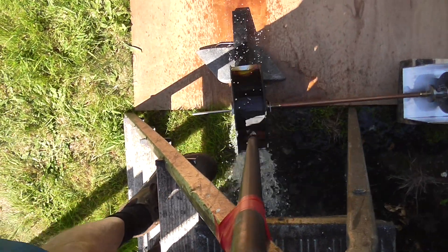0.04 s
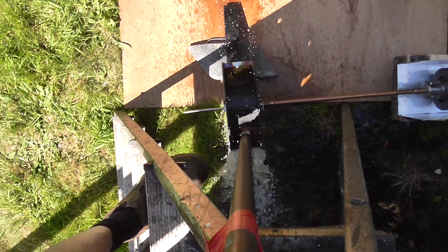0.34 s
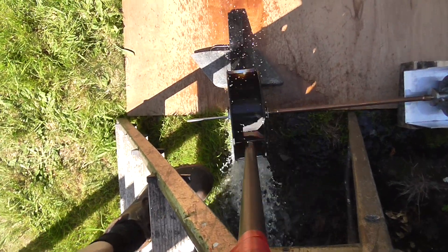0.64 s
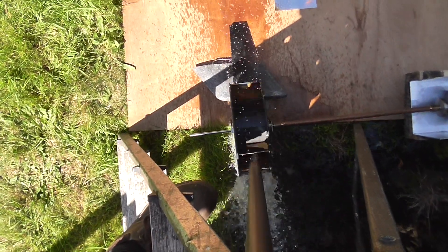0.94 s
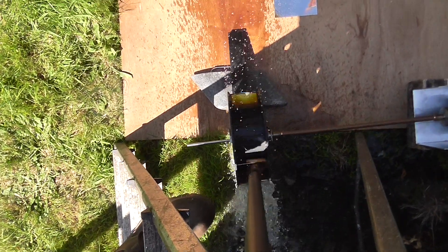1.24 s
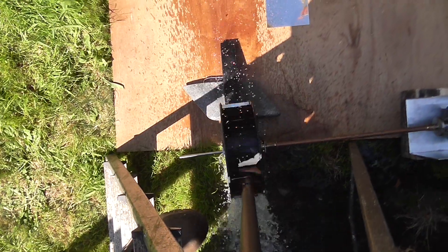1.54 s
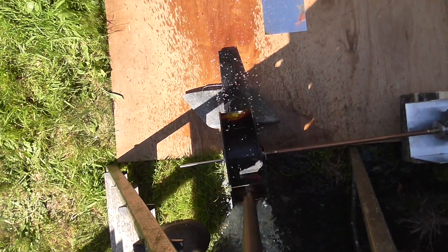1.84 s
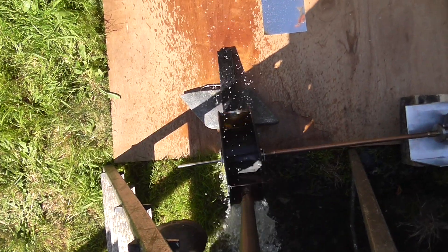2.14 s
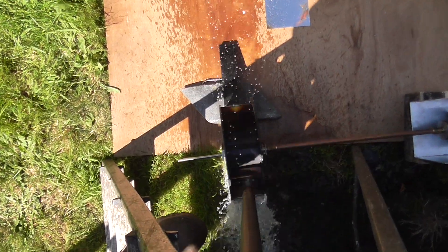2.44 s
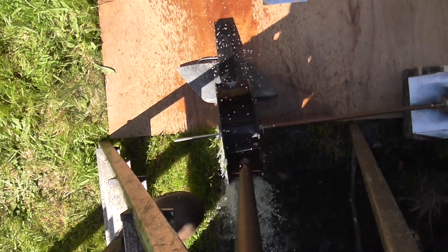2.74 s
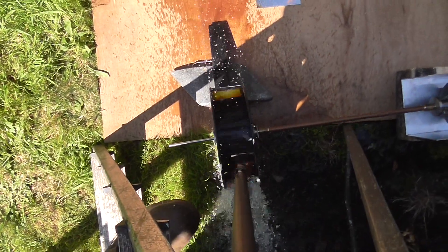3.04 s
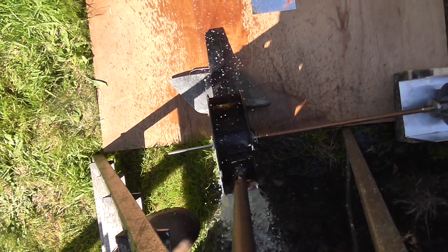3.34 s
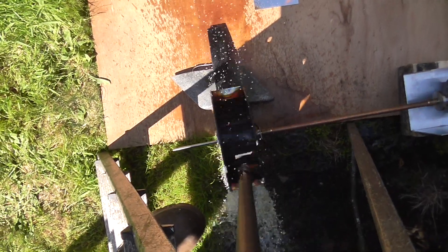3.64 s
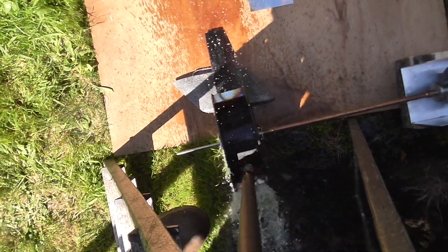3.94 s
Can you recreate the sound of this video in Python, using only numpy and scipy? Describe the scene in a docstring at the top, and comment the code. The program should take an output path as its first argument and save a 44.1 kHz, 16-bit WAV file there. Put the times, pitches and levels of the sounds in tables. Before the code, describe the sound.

Water splashes over a small waterwheel throughout, close up and outdoors, with fast pulsing spray, gurgling bubbles and faint knocking above a steady run-off. Sharp drops tick on wet boards. A heavy slap of water lands at 0.2 seconds and the jet surges at 0.7. Slaps and hollow gulps crowd together from 2.2 to 2.8 seconds, then thin out as the splashing continues to 4 seconds.

```python
"""Outdoors, stereo microphone just above a small waterwheel driven by a jet over wet boards.
The wheel is turning from the start: eight cups cut the jet each turn, throwing spray and knocking
the wheel, while air pockets gulp at the same places and bubbles gurgle over the run-off. A heavy slap
lands at 0.2 s and the jet surges at 0.7 s. Sharp drops hit the boards throughout; slaps and big gulps
crowd together from 2.2 to 2.8 s, then thin out as the wheel runs on."""
import sys
import numpy as np
from scipy import signal
from scipy.fft import rfft, irfft
from scipy.io import wavfile
from scipy.ndimage import uniform_filter1d

SR = 44100
rng = np.random.default_rng(int(sys.argv[2]) if len(sys.argv) > 2 else 0)


def unload_audio(sound):
    """Save the sound as a 16-bit wav file, at the path given as the first command line argument."""
    columns = np.transpose(np.atleast_2d(sound))
    # keep every value between -1 and 1, then stretch to whole-number steps
    steps = np.round(np.clip(columns, -1, 1) * 32767)
    wavfile.write(sys.argv[1], SR, steps.astype(np.int16))


N = 176400
TIME = np.arange(N) / SR
TURN_S = .3626
TURN_STARTS_S = np.arange(-1, N / SR / TURN_S) * TURN_S

# Tone of the run-off: frequency_hz, relative_db
WASH_SPECTRUM = [(45, -46), (100, -9.5), (270, -2.5), (450, -9), (1100, 5), (2000, 3.5), (2800, -10)]
# Reflections off the boards and frame: frequency_hz, level_db
REFLECTION_SPECTRUM = [(600, -25), (4600, -12.5), (6500, -30), (8000, -15), (10000, -4.5), (12500, -11.5)]
# Balance at the microphone: frequency_hz, left_minus_right_db
BALANCE = [(450, -2.5), (5500, 0), (9000, -1.5), (12500, 0)]
# Surging of the jet: time_s, level_db
JET_SURGE = [(0.0, -0.5), (0.2, 0.9), (0.57, -2), (0.7, 3), (0.93, 2), (1.03, 0.5), (1.28, 2.5), (1.61, -1),
             (1.83, 1.3), (2.45, 1), (2.56, -1), (2.8, 2.5), (2.93, 0.5), (3.2, 0.8), (4.0, 1.5)]
# Cups meeting the jet, timed from the start of a turn: start_s, relative_db
CUP_STROKES = [(.093, 5), (0.131, 1), (0.182, 9), (0.22, 9), (0.274, 4.5), (0.309, 7.5), (0.367, 7),
               (.402, 2.5)]
# Modes of the wheel and its mount: pitch_hz, level_db, width_hz
WHEEL_MODES = [(141.3, -60.5, 17.5), (248.6, -54, 8.4), (283.5, -52, 36), (635.5, -46.5, 39),
               (1016, -49.5, 55), (1263, -49.5, 18)]
# Bubbles in the churned water: pitch_hz, relative_db
BUBBLE_SPECTRUM = [(350, -15.5), (520, -13), (700, -5.5), (1350, 1.5), (1650, -7.5), (2100, -5),
                   (2500, -12.5), (3500, -18)]
# Air pockets that gulp on every turn, timed from its start: start_s, pitch_hz, level_db
AIR_POCKETS = [(.130, 1016, -38), (0.277, 1300, -32.5), (.324, 1305, -32)]
# Further gulps, each placed by its own start, among them a gulp near 830 Hz that returns on most turns:
# start_s, pitch_hz, level_db
BIG_GULPS = [(.134, 1037, -23), (.222, 1141, -30), (.222, 653, -25.5), (.466, 1068, -20), (.5, 1090, -36),
             (.615, 846, -27), (.768, 633, -29.5), (0.865, 1047, -29), (.983, 823, -23),
             (1.143, 1175, -28.5), (1.325, 1330, -19), (1.419, 1382, -23), (1.704, 834, -26),
             (1.914, 1109, -27), (2.207, 1387, -21), (2.308, 1038, -20.5), (2.424, 2160, -21.5),
             (2.427, 823, -25), (2.438, 1300, -26), (2.46, 963, -26), (2.575, 643, -27),
             (2.686, 1400, -23.5), (2.756, 1005, -23), (2.788, 833, -24.5), (3.031, 1042, -23.5),
             (3.725, 1093, -23.5), (3.879, 830, -24.5), (3.906, 1474, -23.5)]
# Heavy slaps of water: start_s, level_db, centre_hz, decay_s
WATER_SLAPS = [(.222, -15.5, 625, 0.0058), (0.2213, -12.5, 1860, 0.0038), (0.976, -18, 1710, 0.0046),
               (1.64, -17, 1970, 0.0036), (2.002, -16, 1770, 0.0036), (2.397, -22.5, 1230, 0.01),
               (2.422, -19.5, 1430, 0.02), (2.574, -16, 1000, 0.0066), (2.761, -21, 1043, 0.013),
               (3.577, -21, 2030, 0.0027)]
# Hollow of a cup, rung by the slaps: pitch_hz
CUP_MODES = [657, 843, 1026, 1217, 1583, 2006, 2294]
# Sharp drops on the boards: start_s, level_db
BOARD_DROPS = [(.125, -14), (.2197, -6.5), (.28, -15), (.3865, -13), (.4412, -10), (.4654, -10),
               (.866, -11), (.9488, -11), (1.308, -11.5), (1.4042, -10), (1.5548, -7), (1.8947, -7.5),
               (1.9504, -11.5), (2.0018, -10.5), (2.1281, -11.5), (2.4545, -12), (2.4978, -9), (2.8513, -7),
               (3.087, -12), (3.3402, -11), (3.3526, -11.5), (3.4323, -10), (3.8735, -10), (3.9515, -10.5)]
# Tone of the spray: frequency_hz, relative_db
SPRAY_SPECTRUM = [(1500, -40), (2700, -13.5), (3500, -5), (4400, -3.5), (6000, 0), (8200, -2), (9400, -5),
                  (10600, -11.5), (13500, -11.5), (15800, -25)]


def amp(db):
    """Decibels to gain."""
    return 10 ** (np.asarray(db) / 20)


def unit(x):
    """Scales to rms 1."""
    return x / np.sqrt(np.mean(x ** 2) + 1e-20)


def db_at(spectrum, hz):
    """Reads a spectrum table on a log-frequency axis."""
    table_hz, db = np.transpose(spectrum)
    return np.interp(np.log(hz + 1), np.log(table_hz + 1), db)


def add(mix, start_s, sound):
    """Mixes a sound in at start_s."""
    at = round(start_s * SR)
    sound = sound[max(-at, 0):]
    part = mix[max(at, 0):][:len(sound)]
    part += sound[:len(part)]


def colour(x, spectrum):
    """Filters by a spectrum table."""
    return irfft(rfft(x) * amp(db_at(spectrum, np.fft.rfftfreq(len(x), 1 / SR))), len(x))


def flatten(x):
    """Evens out the long-term spectrum, ready for colouring."""
    spectrum = rfft(x)
    power = abs(spectrum) ** 2
    floor = amp(-25) ** 2 * power.mean()
    return irfft(spectrum / np.sqrt(uniform_filter1d(power, size=1500) + floor), N)


def patter(per_s, size_db):
    """Random impacts, mostly small and a few large."""
    out = np.zeros(N)
    when, luck, side = np.random.default_rng(rng.integers(N)).random((int(per_s * N / SR), 3)).T
    size = np.minimum(-np.log(1 - luck), 4.5)
    out[(when * N).astype(int)] = np.sign(side - .5) * amp(size_db * size)
    return out


def burst(centre_hz, octaves, rise_s, decay_s, top_hz=20000):
    """A brief splash of noise around one pitch."""
    t = TIME[:SR // 5]
    hz = np.fft.rfftfreq(len(t), 1 / SR) + 1
    band = np.exp(-.5 * (np.log2(hz / centre_hz) / octaves) ** 2) / (1 + (hz / top_hz) ** 20)
    noise = unit(irfft(band * np.exp(2j * np.pi * rng.random(len(hz))), len(t)))
    return noise * (1 - np.exp(-t / rise_s)) * np.exp(-t / decay_s)


def run_off(level_db=-35.5, side_db=-13):
    """Water running off makes a steady wash behind the wheel."""
    mid, side = (unit(colour(noise, WASH_SPECTRUM)) for noise in rng.standard_normal((2, N)))
    return amp(level_db) * (mid + amp(side_db) * np.array([side, -side]))


def board_reflections(x, delay_s=.003, decay_s=.02):
    """Reflections from the boards and frame widen the sound, which leans a little to the right."""
    t, hz = TIME[:SR // 8], np.fft.rfftfreq(N, 1 / SR)
    echoes = rfft(rng.standard_normal(len(t)) * np.exp(-t / decay_s) * (t > delay_s), N)
    echoes /= np.sqrt(uniform_filter1d(abs(echoes) ** 2, size=400))
    side = echoes * amp(db_at(REFLECTION_SPECTRUM, hz))
    lean = amp(db_at(BALANCE, hz) / 2)
    return irfft(rfft(x) * np.array([lean + side, 1 / lean - side]), N)


def cup_strokes(rise_s=.0073, vary_db=2.2):
    """A quick swell and fall each time a cup cuts the jet."""
    out, age = np.zeros(N), TIME[:SR // 5] / rise_s
    swell = age * np.exp(1 - age)
    for turn_s in TURN_STARTS_S:
        for start_s, db in CUP_STROKES:
            add(out, turn_s + start_s, amp(db + vary_db * rng.standard_normal()) * swell)
    return unit(out)


def wheel(knocks, steady=.6):
    """The jet drums on each cup and rings the wheel."""
    out, t = np.zeros(N), TIME[:SR // 5]
    drive = (steady + knocks) * rng.standard_normal(N)
    for hz, db, width_hz in WHEEL_MODES:
        ring = np.sin(2 * np.pi * hz * t) * np.exp(-np.pi * width_hz * t) * (1 - np.exp(-hz * t))
        out += amp(db) * unit(signal.oaconvolve(drive, ring)[:N])
    return out


def gurgle(strokes, level_db=-35.5, per_s=900, sizes=30, decay_cycles=6, steady=2.3):
    """Short-lived bubbles of many sizes ring in the churned water, louder at each stroke."""
    out, t = np.zeros(N), TIME[:SR // 10]
    for hz in np.geomspace(BUBBLE_SPECTRUM[0][0], BUBBLE_SPECTRUM[-1][0], sizes):
        ring = np.sin(2 * np.pi * hz * t) * np.exp(-hz * t / decay_cycles) * (1 - np.exp(-hz * t))
        births = patter(per_s / sizes, size_db=2.3) * (steady + strokes)
        bubbles = unit(signal.oaconvolve(births, ring)[:N])
        out += amp(db_at(BUBBLE_SPECTRUM, hz)) * np.sqrt(hz) * bubbles
    return amp(level_db) * unit(out)


def gulp(hz, db, rise_cycles=2.7, decay_cycles=14.4, glide_per_s=.38):
    """A pocket of air swells into a ring and dies away, its pitch drifting up."""
    t = TIME[:SR // 8]
    shape = (1 - np.exp(-(hz * t / rise_cycles) ** 2)) * np.exp(-hz * t / decay_cycles)
    cycles = hz * t * (1 + glide_per_s * t / 2) + rng.random()
    return amp(db) * shape / shape.max() * np.sin(2 * np.pi * cycles)


def gulps(vary_db=2, vary_pitch=.0059):
    """The pattern of gulps that comes round with the wheel, and further gulps placed one by one, among them one
    near 830 Hz that returns on most turns."""
    out = np.zeros(N)
    for turn_s in TURN_STARTS_S:
        for start_s, hz, db in AIR_POCKETS:
            softer, higher = rng.standard_normal(2)
            add(out, turn_s + start_s, gulp(hz * (1 + vary_pitch * higher), db - vary_db * softer))
    for start_s, hz, db in BIG_GULPS:
        add(out, start_s, gulp(hz, db))
    return out


def slaps(ring_db=-7, width_hz=9.7):
    """Water slaps into a cup and rings its hollow."""
    out, t = np.zeros(N), TIME[:SR // 10]
    hollow = sum(np.sin(2 * np.pi * hz * t) for hz in CUP_MODES) * np.exp(-np.pi * width_hz * t)
    for start_s, db, centre_hz, decay_s in WATER_SLAPS:
        slap = burst(centre_hz, octaves=.56, rise_s=.0016, decay_s=decay_s, top_hz=2640)
        ring = unit(signal.fftconvolve(slap, hollow)[:len(slap)]) * slap.std()
        add(out, start_s, amp(db) * (slap + amp(ring_db) * ring))
    return out


def drops(centre_hz=6200, vary_octaves=.35, rise_cycles=.75, spatter_db=-10):
    """Each drop hits the boards with a click a few cycles long and bursts into a brief spatter."""
    out = np.zeros(N)
    for start_s, db in BOARD_DROPS:
        hz = centre_hz * 2 ** (vary_octaves * rng.uniform(-1, 1))
        cycles = hz * TIME[:SR // 5]
        age = cycles / rise_cycles
        click = age * np.exp(1 - age) * np.sin(2 * np.pi * cycles)
        spatter = burst(hz, octaves=.6, rise_s=.0002, decay_s=.0027)
        add(out, start_s, amp(db) * (click + amp(spatter_db) * spatter))
    return out


def clumps(vary_db=2.5, step_s=.016):
    """The level flutters as droplets arrive in uneven clumps."""
    density = np.clip(rng.standard_normal(1000), -2, 2)
    return amp(vary_db * np.interp(TIME, np.arange(len(density)) * step_s, density))


def ticks(hz, flow, per_s, size_db):
    """Droplets of about one size tick on the boards, louder with more flow."""
    out = np.zeros(N)
    for _ in range(2):  # two tick shapes share the rate
        tick = burst(hz, octaves=.54, rise_s=.00013, decay_s=.0013)[:SR // 100]
        out += unit(signal.oaconvolve(flow * patter(per_s / 2, size_db), tick)[:N])
    return out


def splats(flow, decay_s=.001):
    """Fat droplets land, each with a short puff of noise."""
    hits = flow * abs(patter(per_s=70, size_db=1.4))
    envelope = signal.lfilter([1], [1, -np.exp(-1 / (decay_s * SR))], hits)
    return envelope * rng.standard_normal(N)


def spray(strokes, surge, per_s=3000, sizes=8, steady=5):
    """Droplets flung by the cups tick and splat over a finer mist; surges brighten the spray."""
    throw = steady + strokes
    flow = surge * throw
    pitches_hz = np.geomspace(SPRAY_SPECTRUM[1][0], SPRAY_SPECTRUM[-1][0], sizes)
    surge_shares = np.minimum(np.linspace(.72, 2, sizes), 1)  # the fattest follow the surge least
    droplets = sum(ticks(hz, surge ** share * throw * clumps(), per_s / sizes, size_db=3)
                   for hz, share in zip(pitches_hz, surge_shares))
    mist = flow * clumps() * rng.standard_normal(N)
    finest = ticks(hz=12000, flow=flow, per_s=45, size_db=4.6)
    layers = (-28.5, flatten(droplets)), (-32, mist), (-40, splats(flow))
    body = sum(amp(db) * unit(colour(layer, SPRAY_SPECTRUM)) for db, layer in layers)
    return body + amp(-45.5) * unit(finest)


def scene():
    """The wheel and its water just below the microphone, over the wash of the run-off."""
    strokes, knocks = cup_strokes(), cup_strokes()  # same timing, separate strengths
    surge = amp(np.interp(TIME, *np.transpose(JET_SURGE)))
    churn = surge * (gurgle(strokes) + wheel(knocks))
    wash = run_off()
    close_water = spray(strokes, surge) + churn + gulps() + slaps() + drops()
    return wash + board_reflections(close_water)


def record(dry):
    """The recorder cuts off the treble above 15.9 kHz."""
    lowpass = signal.firwin(801, 15900, window=("kaiser", 9), fs=SR)
    return signal.oaconvolve(dry, lowpass[None], "same")


dry = scene()
out = record(dry)
unload_audio(out)
```